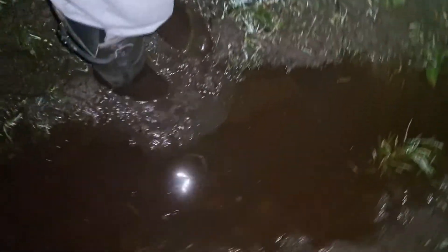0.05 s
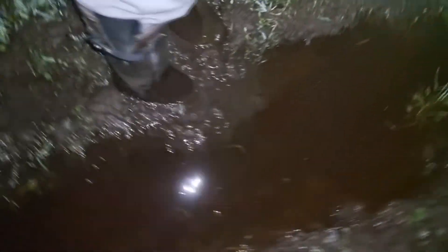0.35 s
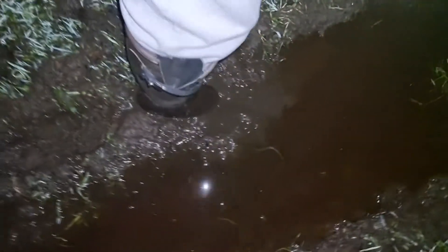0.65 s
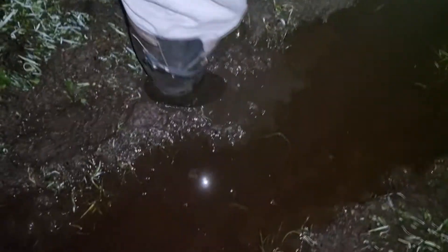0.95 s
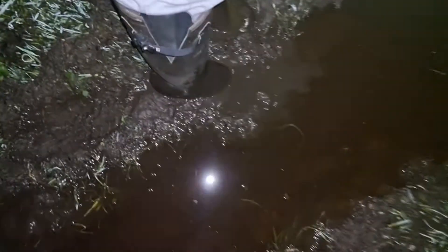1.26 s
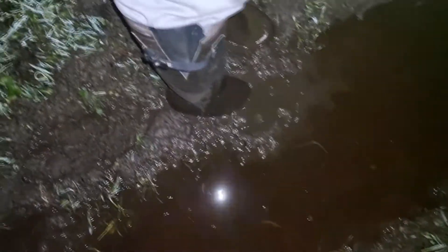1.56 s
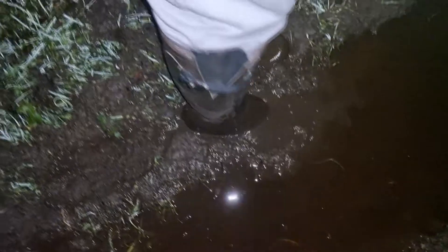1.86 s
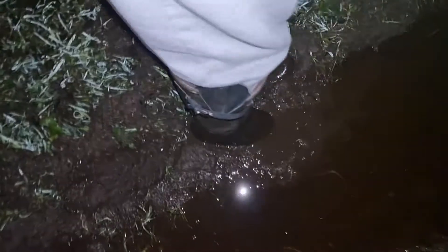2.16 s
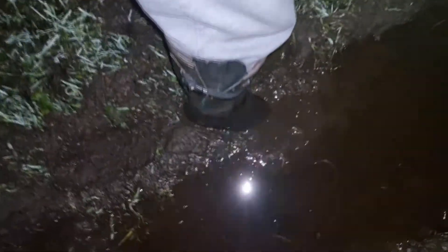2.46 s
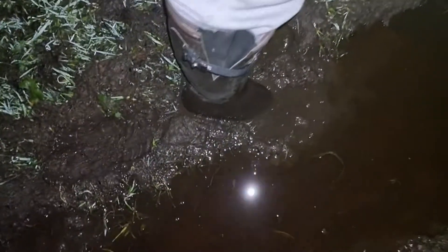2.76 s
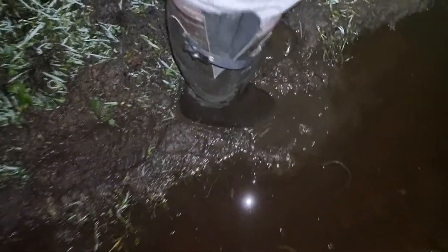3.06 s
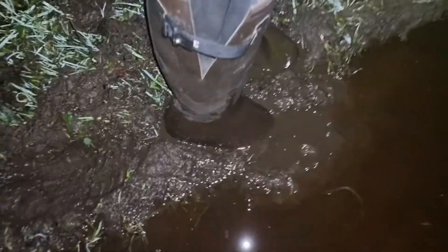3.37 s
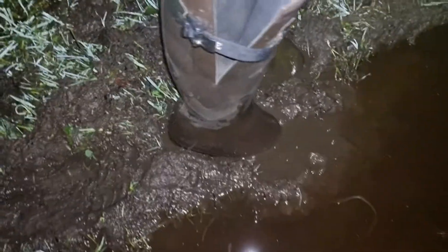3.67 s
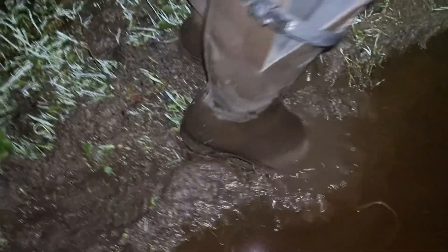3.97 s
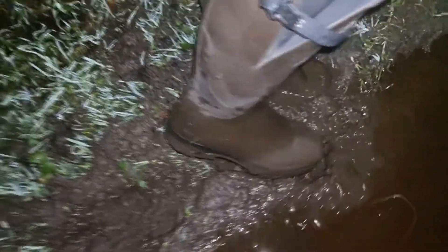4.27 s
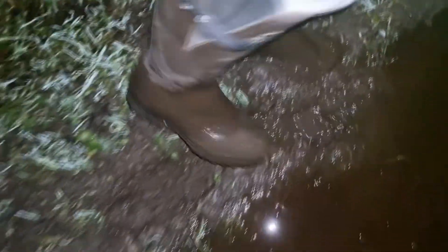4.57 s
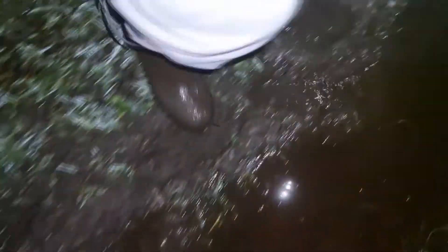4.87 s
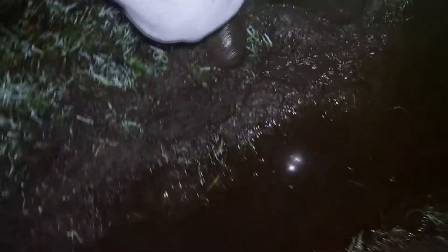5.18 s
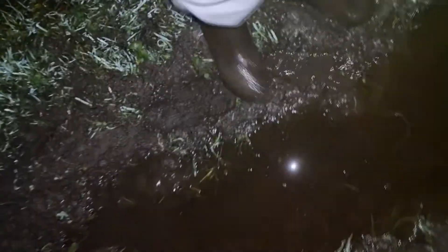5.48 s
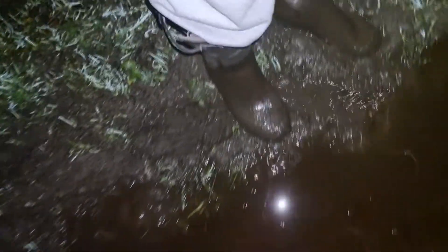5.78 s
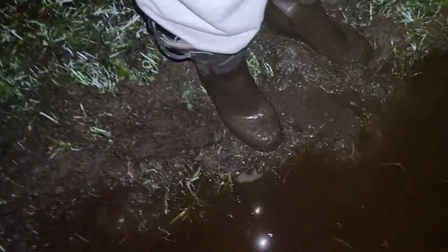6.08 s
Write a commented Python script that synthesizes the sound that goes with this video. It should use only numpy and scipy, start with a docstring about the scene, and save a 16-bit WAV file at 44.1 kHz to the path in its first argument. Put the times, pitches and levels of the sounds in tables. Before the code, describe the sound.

Rubber boots take a few slow, irregular steps in wet mud at a puddle's edge, close to the microphone and slightly left. An early squelch crackles and pops, followed by small bubbles and a soft boot thud. After a lull of faint ticking comes the loudest squelch, then several smaller ones. A low distant rumble sits under the night air.

```python
"""Rubber boots squelch through wet mud: a few slow steps at a puddle's edge, outdoors at night.
Each step forces crackling froth through the gap under the sole; air pockets pop, bubbles ring and
rise in pitch, and the mud keeps ticking between steps. A boot shaft thuds once.
Behind it: a low far rumble, a wavering drone and one faint, brief whistle."""
import sys
import numpy as np
from scipy import signal
from scipy.fft import rfft, irfft
from scipy.io import wavfile
from scipy.ndimage import uniform_filter1d, map_coordinates

SR = 44100
rng = np.random.default_rng(int(sys.argv[2]) if len(sys.argv) > 2 else 0)


def log_audio(samples):
    """Write samples as a 16-bit WAV file to the path given in sys.argv[1]."""
    # one column per channel
    frames = np.atleast_2d(samples).T
    # limit to full scale, then quantise
    limited = np.clip(frames, -1, 1)
    pcm = np.round(limited * 32767).astype(np.int16)
    wavfile.write(sys.argv[1], SR, pcm)


N = 274302
TIME = np.arange(N) / SR
FREQS = np.maximum(np.arange(N // 2 + 1) * SR / N, 1)


def spurts(emptying_db_per_s=35, slap_swell_db_per_s=45):
    """Froth forced out under the sole sounds the narrow cavity, a lower gulp, a mud slap and spray."""
    # start_s, attack_s, hold_s, release_t60_s, level_db, cavity_hz, cavity_octaves,
    # gulp_db, slap_db, spray_db (last three re cavity)
    squelches = [(0.002, .01, .12, .1, -55, 1400, 1, -2, -9, -21),
                 (0.6, .004, .014, .03, -26.5, 3450, .75, -8, -26, -28),
                 (0.639, .005, .015, .03, -27, 6500, .65, -10, -26, -27),
                 (0.664, .036, .088, .16, -22.5, 3750, 1.4, -10, -29, -7),
                 (0.977, .006, .03, .06, -45.5, 2200, .9, 1, -5, -16),
                 (1.012, .012, .01, .04, -36, 2900, .85, -1, -13, -16),
                 (1.044, .014, .014, .16, -38, 2350, .55, -1, -15, -13),
                 (1.835, .03, .1, .04, -58, 11000, 1.4, -18, -8, -1),
                 (2.02, .02, .14, .12, -69, 2400, .8, -8, -4, 3),
                 (3.602, .01, .01, .05, -22.5, 2690, .7, -6, -20, -12),
                 (3.629, .014, .084, .14, -11.8, 2350, 1.55, -15, -24.5, -7),
                 (3.965, .025, .018, .12, -55.5, 2950, .55, -4, -12, 0),
                 (4.188, .042, .014, .06, -47, 2900, .6, 1, -14, -3),
                 (4.273, .026, .008, .035, -37, 3700, .73, -7, -24, -11),
                 (4.6, .003, .003, .03, -32.5, 3400, 1.1, -8, -18, -14),
                 (4.611, .004, .003, .1, -28, 4400, .36, -13, -12, -14),
                 (4.64, .035, .026, .06, -28.5, 4150, .66, -10, -9, -8),
                 (5.45, .06, .03, .16, -51.5, 2800, 1.3, -4, -2, 0),
                 (5.595, .028, .024, .3, -39, 2200, 1.7, -8, -9, -2),
                 (5.755, .005, .012, .03, -48, 3100, .7, 0, -14, -20),
                 (5.775, .009, .006, .07, -37, 3550, .65, -11, -16, -6),
                 (5.928, .012, .04, .06, -39.5, 3200, .8, -9, -13, -4),
                 (5.992, .008, .02, .22, -45.5, 4300, 1.1, -7, -5, -4),
                 (6.095, .013, .006, .15, -47.5, 4400, 2, -4, -15, -4)]
    out, t = np.zeros(N), TIME[:SR // 3]
    for (start_s, attack_s, hold_s, t60_s, level_db, cavity_hz, cavity_octaves,
         gulp_db, slap_db, spray_db) in squelches:
        push = from_db(level_db + 25)  # hard: dense hiss; gentle: single gurgles
        cells_per_s = max(5000 * push ** .6, 700)
        froth = grains(len(t), cells_per_s, spread_db=4, cycles=30, ringing=.75, top_hz=12000)
        froth /= (uniform_filter1d(froth ** 2, size=330) + .02) ** .4  # steady weight evens the flow
        release = from_db(-60 * np.maximum(t - attack_s - hold_s, 0) / t60_s)
        flow = np.minimum(t / attack_s, 1) ** 1.5 * release
        held_s = np.clip(t - attack_s, 0, hold_s)
        emptied_db = -emptying_db_per_s * push * held_s
        # centre_hz, width_octaves, part_db
        resonances = [(cavity_hz, cavity_octaves, emptied_db),
                      (1370, .64, gulp_db + .6 * emptied_db),
                      (350, 1.7, slap_db + slap_swell_db_per_s * held_s),  # grows as the sole sinks
                      (6500, 2.6, spray_db)]
        for centre_hz, width_octaves, part_db in resonances:
            envelope = flow * from_db(level_db + part_db)
            part = rms_one(band(froth, centre_hz, width_octaves) * envelope)
            add(out, start_s, part * np.sqrt(np.mean(envelope ** 2)))
    return out


def pops(t60_cycles=19, crack_s=.00052, opening_s=.0002, rise_per_s=20):
    """Air pockets tear open and ring down in milliseconds: big ones crack, small ones plip upward."""
    # start_s, level_db, pitch_hz
    pockets = [(0.1926, -40.5, 6600), (0.5909, -35, 2940), (0.604, -17.5, 3300), (0.6564, -9, 5630),
               (0.71, -11, 3080), (0.7291, -10, 3200), (0.738, -10, 3350), (1.104, -31, 2600),
               (1.1222, -33, 5200), (1.1552, -34, 8200), (1.5075, -47, 4480), (1.7128, -46.5, 3980),
               (1.8422, -40, 6500), (1.865, -41, 5300), (1.9318, -37, 6160), (2.4601, -39.5, 4970),
               (3.2106, -52, 5030), (3.314, -47, 6700), (3.5796, -34, 3100), (3.593, -26, 5000),
               (3.6035, -17, 4200), (3.6454, -5.5, 2550), (3.6556, -6, 2160), (3.724, -11, 4300),
               (3.784, -23, 6940), (3.8666, -34, 4230), (3.8793, -30.5, 7000), (3.923, -38, 3570),
               (4.0701, -34, 3750), (4.0935, -31.5, 4980), (4.2391, -25.5, 5500), (4.2676, -21.5, 5760),
               (4.3011, -19, 4500), (4.52, -31.5, 5260), (4.5923, -31, 4210), (4.6145, -14, 4300),
               (4.6508, -20.5, 4600), (4.6667, -15, 4230), (4.6773, -16, 3910), (5.14, -37.5, 3290),
               (5.6758, -28, 7390), (5.7307, -33.5, 4000), (5.7862, -30, 3520), (5.9006, -24.5, 7100),
               (5.9393, -24.5, 3700), (5.953, -25, 3760)]
    out, t = np.zeros(N), TIME[:SR // 40]
    for start_s, level_db, pitch_hz in pockets:
        phase = 2 * np.pi * pitch_hz * t * (1 + rise_per_s * t / 2)
        ring = np.sin(phase) * from_db(-60 * t * pitch_hz / t60_cycles)
        tear = rms_one(band(rng.standard_normal(len(t)), hz=5000, octaves=2.9)) * np.exp(-t / crack_s)
        crack_gain = .5 * from_db(level_db + 10) ** .23
        pop = (ring + crack_gain * tear) * (1 - np.exp(-t / opening_s))
        add(out, start_s, from_db(level_db) * pop / np.abs(pop).max())
    return out


def bubbles(t60_cycles=47, attack_share=.017):
    """A bubble's note climbs as it nears the surface; big low ones ring longest."""
    # start_s, level_db, pitch_hz, rise_octaves_per_s
    notes = [(0.097, -37.5, 1500, 14), (0.197, -40, 3100, 0), (1.033, -21, 1226, 11),
             (1.049, -28, 1310, 10), (1.065, -24.5, 2630, 16), (1.09, -29, 1860, 2),
             (4.188, -22.5, 588.6, 15.5), (4.24, -28.5, 890, 21), (4.288, -24.5, 2850, 21),
             (4.407, -33, 1770, 0), (4.474, -39, 1285, 7.5), (4.523, -40, 1280, 14), (4.547, -38, 1856, 0),
             (5.966, -28, 1370, 5), (5.969, -22, 2750, 26), (5.993, -33, 686, 24), (6.003, -31, 1064, 39)]
    out, t = np.zeros(N), TIME[:SR // 12]
    for start_s, level_db, pitch_hz, rise_octaves_per_s in notes:
        t60_s = t60_cycles / pitch_hz
        glide_hz = pitch_hz * 2 ** (rise_octaves_per_s * (t - t60_s / 10))
        phase = 2 * np.pi * np.cumsum(glide_hz) / SR
        envelope = (1 - np.exp(-t / (attack_share * t60_s))) * from_db(-60 * t / t60_s)
        add(out, start_s, from_db(level_db) * np.sin(phase) * envelope / envelope.max())
    return out


def settling(tick_db=-3.2, snap_db=-4.5, droplet_db=-6, clump_db=3.5):
    """Water creeps back into the footprints: clumped ticks, lone snaps, pitched droplets."""
    ticks = grains(N, per_s=930, spread_db=1, cycles=11, ringing=.3, top_hz=15800)
    clumps = from_db(clump_db * rms_one(band(rng.standard_normal(N), hz=18, octaves=2.5)))
    snaps = grains(N, per_s=35, spread_db=2.5, cycles=14, ringing=.25, top_hz=12000)
    droplets = grains(N, per_s=60, spread_db=4, cycles=28, ringing=.97, top_hz=8000, pitch_count=40)
    ticks = from_db(tick_db) * rms_one(band(ticks * clumps, hz=10000, octaves=3.8))
    snaps = from_db(snap_db) * rms_one(band(snaps, hz=9500, octaves=2.2))
    droplets = from_db(droplet_db) * rms_one(band(droplets, hz=3500, octaves=2.6))
    return mud_activity() * (ticks + snaps + droplets)


def mud_activity(resting_db=-84, rise_s=.09, settle_s=.23):
    """Gain of the ticking: each shift of weight stirs the mud, which then comes to rest."""
    # peak_s, level_db
    treads = [(0.05, -60), (0.25, -66), (0.88, -59), (1.25, -63), (1.6, -68), (2.12, -67), (3.27, -71),
              (3.82, -53.5), (4.02, -59), (4.21, -50), (5.57, -48), (5.95, -54)]
    power = from_db(resting_db) ** 2
    for peak_s, level_db in treads:
        before_s, after_s = np.maximum(peak_s - TIME, 0), np.maximum(TIME - peak_s, 0)
        stir = from_db(level_db) * np.exp(-before_s / rise_s) / (1 + after_s / settle_s) ** 2
        power = power + stir ** 2
    return np.sqrt(power)


def knock():
    """The rubber boot shaft gives one short dull thud."""
    # start_s, level_db, centre_hz, width_octaves, decay_s
    shaft = (1.364, -40.5, 470, 2.2, .009)
    start_s, level_db, centre_hz, width_octaves, decay_s = shaft
    out, t = np.zeros(N), TIME[:SR // 8]
    thud = rms_one(band(rng.standard_normal(len(t)), centre_hz, width_octaves))
    add(out, start_s, from_db(level_db) * thud * np.exp(-t / decay_s))
    return out


def night(air_db=-50.5, low_cut_hz=33, drone_hz=75):
    """Night air and far rumble, alike on both sides in the bass, with a wavering far drone."""
    # freq_hz, relative_density_db
    air_spectrum = [(20, -18), (28, -13), (50, -1), (70, -.5), (160, -10), (300, -16), (400, -25.5),
                    (550, -24), (800, -21.5), (1160, -30), (1520, -34.5), (2600, -48.5), (3400, -52.5),
                    (6500, -49.5), (9000, -60.5), (16000, -51)]
    # freq_hz, side_re_mid_db
    air_width = [(60, -13), (110, -14), (200, -7.5), (380, 1), (700, 3.5), (1290, 10.5), (2380, 0),
                 (4400, 2), (8120, 2), (15000, 1.5)]
    # time_s, level_db
    drone_levels = [(0, -50), (.5, -53), (1.5, -52), (2.3, -65), (3.5, -62), (4.5, -66.5), (5.5, -68),
                    (6.2, -60)]
    mid, side = rng.standard_normal((2, N))
    gains = from_db(at_hz(air_spectrum)) / np.sqrt(1 + (low_cut_hz / FREQS) ** 4)
    mid = colour(mid, gains)
    side = colour(side, gains * from_db(at_hz(air_width)))
    air = from_db(air_db) * np.array([mid + side, mid - side]) / np.std(mid)
    drone_db, = in_time(drone_levels)
    drone = from_db(drone_db) * rms_one(band(rng.standard_normal(N + SR), drone_hz, octaves=.17)[SR:])
    return (air + drone) * from_db([[.4], [-.4]])  # slightly left


def whistle():
    """One faint thin note sliding upward."""
    # time_s, pitch_hz, level_db
    glide = [(.35, 2380, -95), (.385, 2450, -75), (.43, 2570, -73), (.53, 2600, -71), (.555, 2660, -76)]
    pitch_hz, level_db = in_time(glide)
    sounding = (TIME > glide[0][0]) & (TIME < glide[-1][0])
    return sounding * from_db(level_db) * np.sin(2 * np.pi * np.cumsum(pitch_hz) / SR)


def place(x, near_db=-6, far_db=-25):
    """Boot on the left, with echoes: the right side is shaded in the mids; lag follows the bearing."""
    # time_s, right_shade_db, left_lag_ms
    bearing = [(0, 22, -0.027), (.6, 11.5, -0.017), (1.1, 16, -0.034), (2.0, 16.5, 0.011),
               (3.6, 5.5, 0.033), (4.3, 8.5, 0.13), (4.65, 4, 0.19), (5.6, 7.5, 0.11), (6.2, 8, 0.17)]
    # freq_hz, shade_share
    shadow = [(150, 0), (400, 1), (1200, 0.97), (5000, .95), (8000, 0.6), (13000, 0)]
    shade_db, lag_ms = in_time(bearing)
    lagged = map_coordinates(x, [np.arange(N) - lag_ms * SR / 1000], order=3)
    near = from_db(near_db) * scatter(x, t60_s=.02, first_s=.00059, size=SR // 50)
    far = from_db(far_db) * scatter(x, t60_s=.16, first_s=.01, size=SR // 8)
    left, right = from_db(-.5) * (np.array([lagged, x]) + near + far)
    right = right - (1 - from_db(-shade_db)) * colour(right, at_hz(shadow))
    return np.array([left, right])


def scatter(x, t60_s, first_s, size):
    """Small echoes off legs, ground and grass, different per side and changing as the walker moves."""
    hop, t = SR // 16, TIME[:size]
    padded, out = np.pad(x, (hop, 2 * hop)), np.zeros((2, N + 3 * hop + size))
    fade = signal.windows.hann(2 * hop, sym=False)
    decay = from_db(-60 * t / t60_s) * (t > first_s)
    for start in range(0, N + hop, hop):
        echoes = rng.standard_normal((2, size)) * decay / np.linalg.norm(decay)
        heard = signal.fftconvolve((fade * padded[start:start + 2 * hop])[None], echoes, axes=1)
        out[:, start:start + heard.shape[1]] += heard
    return out[:, hop:hop + N]


def grains(size, per_s, spread_db, cycles, ringing, top_hz, pitch_count=26):
    """Tiny air cells burst at random, snap and ring; `ringing` is the rings' share of the power."""
    strengths = from_db(spread_db * np.minimum(rng.exponential(1, size), 3.5))
    signs = rng.choice([-1, 1], size)
    snaps = strengths * signs * (rng.random(size) < per_s / SR)
    pitch_index = rng.integers(0, pitch_count, size)
    pitches_hz = np.geomspace(700, top_hz, pitch_count) * rng.uniform(.96, 1.04, pitch_count)
    rings = np.zeros(size)
    for k, hz in enumerate(pitches_hz):
        radius, angle = from_db(-60 * hz / (cycles * SR)), 2 * np.pi * hz / SR
        feedback = [1, -2 * radius * np.cos(angle), radius ** 2]
        rings += hz * signal.lfilter([0, np.sin(angle)], feedback, snaps * (pitch_index == k) + 1e-18)
    return np.sqrt(1 - ringing) * rms_one(snaps) + np.sqrt(ringing) * rms_one(rings)


def from_db(db):
    """Decibels to gain."""
    return 10 ** (np.asarray(db) / 20)


def rms_one(x):
    """Scale to unit rms."""
    return x / np.sqrt(np.mean(x ** 2) + 1e-20)


def in_time(rows):
    """Interpolate (time_s, values...) rows at every sample."""
    time_s, *columns = np.transpose(rows)
    return [np.interp(TIME, time_s, column) for column in columns]


def at_hz(rows):
    """Interpolate (freq_hz, value) rows at every FFT bin."""
    hz, value = np.transpose(rows)
    return np.interp(np.log(FREQS), np.log(hz), value)


def colour(x, gains):
    """Apply one gain per FFT bin."""
    return irfft(rfft(x) * gains, N)


def band(x, hz, octaves):
    """Band-pass resonance."""
    edge_ratio = 2 ** (octaves / 2)
    edges_hz = [hz / edge_ratio, min(hz * edge_ratio, .45 * SR)]
    return signal.sosfilt(signal.butter(2, edges_hz, "band", fs=SR, output="sos"), x)


def add(track, start_s, sound):
    """Mix a sound into the track."""
    start = round(start_s * SR)
    track[start:start + len(sound)] += sound[:N - start]


def scene():
    """Mud close to the microphone, the night around it."""
    # freq_hz, gain_db
    mic_response = [(100, -0.5), (7200, -1), (8400, -12), (10500, -17.5), (13000, -12.5), (16000, -9)]
    mud = from_db(-.2) * spurts() + from_db(1.5) * pops() + from_db(-3.5) * bubbles()
    mud = mud + settling() + knock()
    return colour(place(mud), from_db(at_hz(mic_response))) + whistle() + night()


def record(dry):
    """Steep low-pass."""
    cutoff_hz = 15900
    return signal.sosfilt(signal.ellip(12, .1, 80, cutoff_hz, fs=SR, output="sos"), dry)


dry = scene()
out = record(dry)
log_audio(out)
```